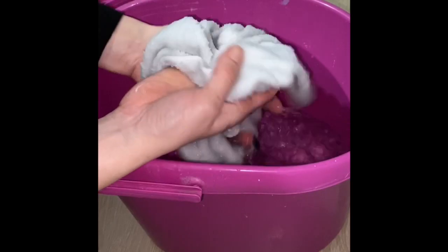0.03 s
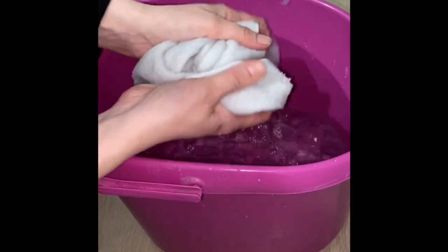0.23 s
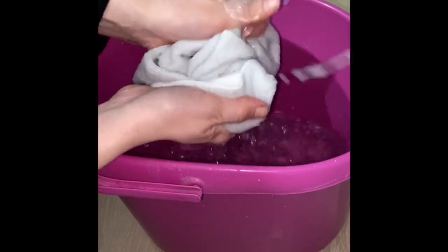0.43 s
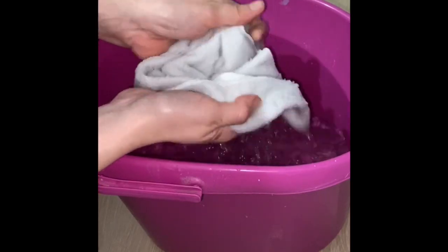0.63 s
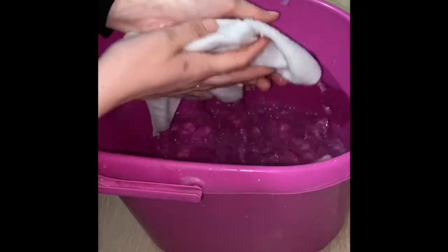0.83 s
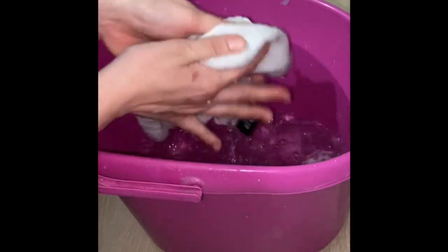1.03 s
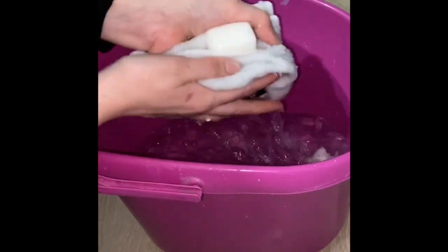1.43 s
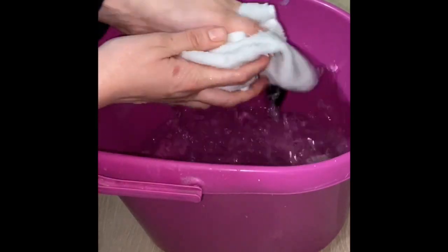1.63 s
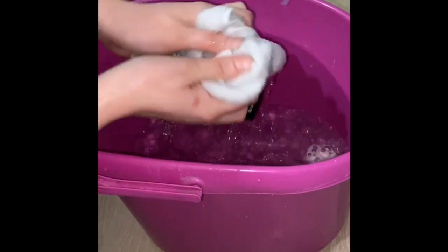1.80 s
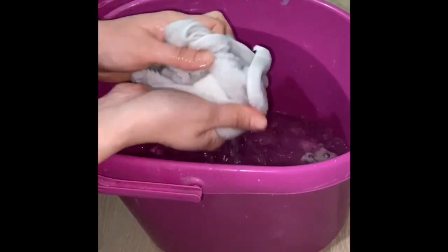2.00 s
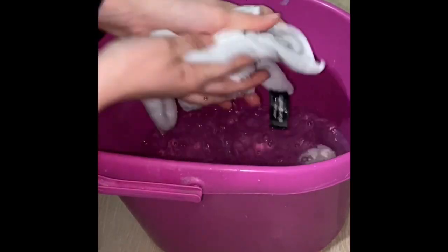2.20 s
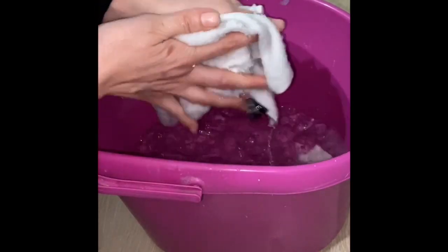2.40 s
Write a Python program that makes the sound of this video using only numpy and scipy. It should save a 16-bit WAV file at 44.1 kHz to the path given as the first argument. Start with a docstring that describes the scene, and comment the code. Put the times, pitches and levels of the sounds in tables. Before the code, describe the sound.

Water trickles from a wet cloth into a plastic bucket as hands squeeze it about three times. Drops splash and plop while the fabric fizzes and squelches, heard close up in a small room with a low hum.

```python
"""A wet cloth, squeezed and turned by hand over a plastic bucket of water in a small room.
Each squeeze lets a trickle fall: drops slap the surface and trap ringing bubbles, while the cloth
fizzes, squelches and thuds softly. Bucket wall and room throw the water sounds back over a low hum.
Heard from close by, through a pair of microphone ports."""
import sys
import numpy as np
from scipy import signal
from scipy.fft import rfft, irfft
from scipy.io import wavfile

SR = 44100
rng = np.random.default_rng(int(sys.argv[2]) if len(sys.argv) > 2 else 0)


def to_wav(sig):
    """Store sig (one row per channel, or 1-D mono) as 16-bit WAV at the path in sys.argv[1].

    Samples outside -1..1 are clipped; the rate is SR.
    """
    pcm = np.clip(np.atleast_2d(sig), -1, 1) * 32767
    pcm = np.round(pcm).astype(np.int16)
    wavfile.write(sys.argv[1], SR, pcm.T)  # frames by channels


N = 112454

# The room's rumble. Each row: frequency in Hz, relative level in dB.
RUMBLE_SPECTRUM = [(28, -11), (50, 4.5), (72, -9), (120, 4.5), (190, -6), (380, -8.5), (520, -20),
                   (1000, -26), (15000, -54)]
# The room's hum. Each row: frequency in Hz, level in dB.
HUM_TONES = [(118.4, -61), (340, -63)]
# Water leaving the cloth. Each row: time in seconds, trickle level in dB, fizz level in dB.
CLOTH_FLOW = [(0, -60.5, -63.5), (.25, -57.5, -54.5), (.32, -53.5, -60), (.41, -47.5, -46.5),
              (.59, -43, -40), (0.636, -48, -45.5), (0.701, -43, -42.5), (.90, -49, -48),
              (1.04, -57.5, -62.5), (1.221, -59.5, -46), (1.33, -48, -49.5), (1.429, -50.5, -48.5),
              (1.55, -44.5, -47.5), (1.66, -50.5, -53), (1.74, -55, -56), (1.858, -49, -53),
              (1.92, -65, -59.5), (1.996, -59.5, -51.5), (2.03, -53, -45.5), (2.08, -50, -56),
              (2.14, -46, -46), (2.23, -56, -63.5), (2.34, -60, -60.5), (2.55, -59, -62)]
# Tone of the trickle. Each row: frequency in Hz, relative gain in dB.
TRICKLE_EQ = [(200, -24), (600, 3), (1000, -4), (2000, 3), (5400, 2.5), (8000, -9), (16000, -35)]
# Tone of the fizz. Each row: frequency in Hz, relative gain in dB.
FIZZ_EQ = [(300, 1), (1000, 10), (3000, 14), (5500, 8), (10000, 14.5), (15500, 14), (16500, -12)]
# The larger bubbles in the bucket. Each row: start in seconds, pitch in Hz, peak level in dB.
LARGE_BUBBLES = [(.054, 2090, -47.5), (0.164, 1380, -48), (.333, 1387, -36.5), (0.4223, 3750, -30),
                 (.426, 1085, -33), (0.507, 1353, -33), (0.563, 1036, -26), (.624, 670, -46),
                 (0.6448, 1210, -29.5), (.646, 2330, -26.5), (0.755, 3140, -25), (.779, 1950, -29.5),
                 (.789, 3500, -28.5), (.813, 4120, -29), (.814, 818, -43.5), (.960, 4290, -32.5),
                 (1.217, 2570, -35.5), (1.261, 838, -38.5), (1.304, 3180, -35.5), (1.319, 1780, -42.5),
                 (1.373, 813, -33), (1.388, 2560, -42), (1.438, 3310, -31), (1.46, 1025, -40),
                 (1.4667, 1958, -30), (1.517, 1960, -34.5), (1.536, 2045, -32.5), (1.5776, 904, -26.5),
                 (1.585, 4430, -32.5), (1.622, 744, -42), (1.825, 1763, -31), (1.849, 1326, -41),
                 (2.014, 951, -38), (2.111, 3240, -33), (2.1441, 1168, -30.5), (2.188, 4180, -35),
                 (2.252, 1730, -40.5)]
# Drops hitting the water. Each row: start in seconds, level in dB, band centre in Hz, decay in ms.
DROP_SLAPS = [(0.331, -31.5, 12000, 3.6), (.351, -40, 1400, 14), (0.422, -35.5, 2720, 6.8),
              (0.4402, -31.5, 4300, 3.7), (0.456, -33.5, 3200, 9.4), (0.518, -30.5, 8900, 1.7),
              (0.5442, -32, 3580, 7.2), (0.644, -30.5, 1900, 1.2), (0.6584, -28, 2000, 1.9),
              (0.756, -34, 5000, 1.4), (0.7777, -24, 8600, 1.9), (0.8121, -22, 5500, 2.1),
              (0.851, -33.5, 9500, 9.2), (.954, -32, 9700, 2.2), (1.094, -36.5, 8850, 1.4),
              (1.138, -40.5, 5830, 4.8), (1.2569, -36, 2660, 3.1), (1.3041, -31, 5900, 0.95),
              (1.334, -35, 2700, 1.7), (1.388, -30.5, 3570, 10.4), (1.5361, -35, 3530, 8.4),
              (1.608, -36.5, 4000, 2.7), (1.621, -40.5, 875, 5.7), (1.6352, -31, 12000, 2.9),
              (2.0098, -35, 4100, 4), (2.013, -37.5, 890, 3.9), (2.029, -36, 3600, 3.7),
              (2.131, -38, 3830, 7.4), (2.188, -35, 4700, 3.2), (2.2424, -30.5, 11800, 1.5),
              (2.252, -40, 6000, 2)]
# Presses on the cloth. Each row: start in seconds, length in seconds, level in dB.
PALM_PRESSES = [(0.332, 0.047, -51), (0.4, 0.23, -46.5)]
# Air forced through wet folds. Each row: start in seconds, length in seconds, first pitch in Hz,
# last pitch in Hz, peak level in dB.
AIR_POCKETS = [(0.348, 0.047, 1436, 2330, -39.5), (0.438, 0.006, 3090, 4160, -22),
               (0.511, 0.024, 1274, 1984, -38.5), (0.658, 0.0051, 2850, 4450, -18.5),
               (0.689, 0.0085, 4870, 5560, -27.5), (0.8668, 0.015, 1520, 5030, -23),
               (1.767, 0.012, 2720, 3930, -37)]
# Phase between the microphone ports. Each row: frequency in Hz, lead of the left port in radians.
LEFT_PORT_LEAD = [(500, 0), (1000, -.5), (1900, 0), (2600, .45), (4400, .6), (5100, .1), (7400, 3.14),
                  (16500, 12.6)]


def undb(db):
    """Decibels to gain."""
    return 10 ** (np.asarray(db) / 20)


def unit(x):
    """Scale to rms 1."""
    return x / np.sqrt(np.mean(x ** 2) + 1e-20)


def add(out, start_s, x):
    """Mix a short sound in at its time."""
    i = max(int(start_s * SR), 0)
    out[i:i + len(x)] += x[:max(N - i, 0)]


def freqs(size):
    """Frequencies of a spectrum's bins."""
    return np.maximum(np.arange(size // 2 + 1) * SR / size, 1)


def colour(x, points):
    """Filter by a table of (Hz, dB)."""
    hz, db = np.array(points).T
    return irfft(rfft(x) * undb(np.interp(np.log(freqs(N)), np.log(hz), db)), N)


def band_noise(hz, width_oct, size):
    """Noise in a bell-shaped band."""
    bell = np.exp(-.5 * (np.log2(freqs(size) / hz) / width_oct) ** 2)
    return unit(irfft(rfft(rng.standard_normal(size)) * bell, size))


def wander(per_s):
    """Random values joined by straight lines."""
    return np.interp(np.arange(N) * per_s / SR, np.arange(N), np.clip(rng.standard_normal(N), -2, 2))


def room_tone(rumble_db=-51.5, side_db=-9):
    """Low rumble, the same at both ports in the bass, and a faint steady hum."""
    t = np.arange(N) / SR
    mid, side = (unit(colour(rng.standard_normal(N), RUMBLE_SPECTRUM)) for _ in range(2))
    side = signal.lfilter(*signal.butter(2, 400, "high", fs=SR), side)
    hum = sum(np.sqrt(2) * undb(db) * np.sin(2 * np.pi * (hz * t + rng.random())) for hz, db in HUM_TONES)
    return undb(rumble_db) * (mid + undb(side_db) * np.array([side, -side])) + hum


def bubble(hz, decay_s, large=0, rise=.0077, attack_cycles=.9, pinch_cycles=.8, linger_s=.035):
    """Trapped air rings and fades, climbing in pitch as it rises; a large bubble lingers."""
    t = np.arange(int(7 * (linger_s if large else decay_s) * SR) + 2) / SR
    # A large bubble starts sharp as its neck pinches off.
    pinch = .6 * large * pinch_cycles * (1 - np.exp(-hz * t / pinch_cycles))
    cycles = np.cumsum(hz * (1 + rise * np.minimum(t / decay_s, 2))) / SR + pinch
    envelope = np.exp(-t / decay_s) + .25 * large * np.exp(-t / linger_s)
    envelope *= 1 - np.exp(-cycles / attack_cycles)
    return np.sin(2 * np.pi * cycles) * envelope / envelope.max()


def flow_gain(column):
    """Gain over time from one level column of the cloth's flow."""
    rows = np.array(CLOTH_FLOW)
    return undb(np.interp(np.arange(N) / SR, rows[:, 0], rows[:, column]))


def small_bubbles(gain, max_per_s, low_hz, high_hz, max_cycles, spread_db):
    """Small bubbles ring at random; a weak flow gives fewer of them."""
    out, density = np.zeros(N), np.sqrt(gain / gain.max())
    draws = rng.random((20000, 5))
    for when, pitch, strength, damping, luck in draws[:int(max_per_s * N / SR)]:
        share = density[int(when * N)]
        if luck < share:
            hz = low_hz + (high_hz - low_hz) * pitch ** 1.3
            db = -spread_db * np.log(max(strength, .08))
            ring = bubble(hz, decay_s=max_cycles / hz * np.exp(-damping))
            add(out, when * N / SR, undb(db) / np.sqrt(share) * ring)  # same power at any density
    return out


def seeping(grains, gain, crossover_db=-57):
    """A weak flow seeps with a soft hiss; a stronger one breaks into grains."""
    share = gain ** 2 / (gain ** 2 + undb(crossover_db) ** 2)
    return np.sqrt(share) * unit(grains) + np.sqrt(1 - share) * rng.standard_normal(N)


def trickle():
    """Water falls from the cloth into the bucket, setting small bubbles ringing."""
    gain = flow_gain(column=1)
    drips = small_bubbles(gain, max_per_s=1500, low_hz=899, high_hz=8800, max_cycles=5, spread_db=2.5)
    return unit(colour(seeping(drips, gain), TRICKLE_EQ)) * gain


def fizz(clump_db=4):
    """Tiny bubbles burst in clumps in the squeezed cloth."""
    gain = flow_gain(column=2)
    pops = small_bubbles(gain, max_per_s=3500, low_hz=3730, high_hz=14800, max_cycles=6, spread_db=5)
    pops *= undb(clump_db * wander(per_s=130))
    return unit(colour(seeping(pops, gain), FIZZ_EQ)) * gain


def plops(decay_cycles=7.5, large_hz=900):
    """Large drops trap single ringing bubbles; the lower the pitch, the larger the bubble."""
    out = np.zeros(N)
    for start, hz, db in LARGE_BUBBLES:
        add(out, start, undb(db) * bubble(hz, decay_cycles / hz, large=min(large_hz / hz, 1) ** 2))
    return out


def slaps(attack_share=.13):
    """Each impact on the water is a quickly fading burst of spray; longer ones start more softly."""
    out = np.zeros(N)
    for start, db, hz, decay_ms in DROP_SLAPS:
        spray = band_noise(hz, width_oct=.74, size=4096)
        ms = np.arange(len(spray)) * 1000 / SR
        attack_ms = attack_share * decay_ms
        envelope = np.minimum(ms / attack_ms, 1) * np.exp(-np.maximum(ms - attack_ms, 0) / decay_ms)
        add(out, start, undb(db) * spray * envelope)
    return out


def thuds():
    """The heavy cloth thuds softly as it is pressed between the palms."""
    t, press = np.arange(N) / SR, 0
    for start, length, db in PALM_PRESSES:
        progress = np.clip((t - start) / length, 0, 1)
        press += undb(db) * np.sin(np.pi * progress ** .5)
    return press * band_noise(hz=165, width_oct=.7, size=N)


def squelches(flutter=.135):
    """An air pocket shrinks in the wet folds: its whistle swells, sweeps unsteadily upward and dies."""
    out = np.zeros(N)
    for start, length, from_hz, to_hz, db in AIR_POCKETS:
        progress = np.linspace(0, 1, int(length * SR))
        hz = from_hz + (to_hz - from_hz) * progress
        hz *= 1 + flutter * wander(per_s=900)[:len(hz)]
        swell = np.sin(np.pi * progress ** .86) ** 2
        add(out, start, undb(db) * swell * np.sin(2 * np.pi * np.cumsum(hz) / SR))
    return out


def echoes(x, t60_s, gap_s, dull_hz, likeness):
    """Dense fading reflections; likeness is the share of their power common to both ports."""
    t = np.arange(SR // 2) / SR
    shared, left, right = rng.standard_normal((3, len(t)))
    tail = np.sqrt(likeness) * shared + np.sqrt(1 - likeness) * np.array([left, right])
    tail *= undb(-60 * t / t60_s) * (t > gap_s)
    tail /= np.sqrt(np.sum(tail ** 2) / 2)
    tail = signal.lfilter(*signal.butter(1, dull_hz, fs=SR), tail)
    return signal.fftconvolve(x[None], tail, axes=1)[:, :N]


def scene(right_db=.7):
    """Close to the bucket: water a touch right of centre, its reflections, thuds and room tone."""
    water = plops() + squelches() + slaps() + trickle() + fizz()
    water = signal.lfilter(*signal.butter(2, 250, "high", fs=SR), water)  # too small to radiate bass
    bucket = undb(-12) * echoes(water, t60_s=.036, gap_s=.00068, dull_hz=13000, likeness=0)
    room = undb(-8.5) * echoes(water, t60_s=.34, gap_s=.0078, dull_hz=8300, likeness=.3)
    balance = undb(np.array([[-right_db], [right_db]]) / 2)
    return (water + bucket + room) * balance + thuds() + room_tone()


def record(dry, low_cut_hz=36, top_hz=16200):
    """The two microphone ports hear the treble out of step; the lowest bass and the top are cut."""
    lead = np.interp(freqs(N), *np.array(LEFT_PORT_LEAD).T, left=0)
    ports = irfft(rfft(dry) * np.exp(.5j * np.array([lead, -lead])), N)
    ports = signal.sosfilt(signal.butter(4, low_cut_hz, "high", fs=SR, output="sos"), ports)
    return signal.sosfilt(signal.ellip(8, .2, 70, top_hz, fs=SR, output="sos"), ports)


dry = scene()
out = record(dry)
to_wav(out)
```